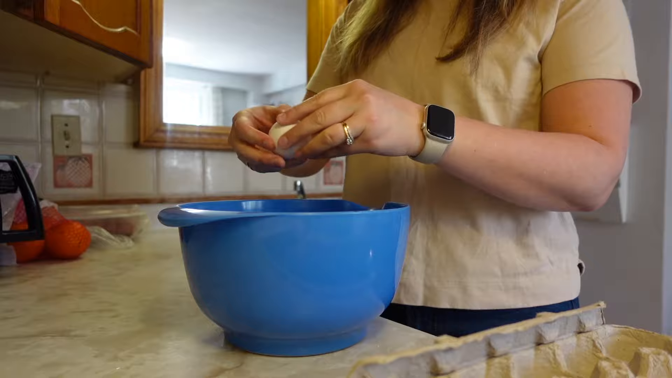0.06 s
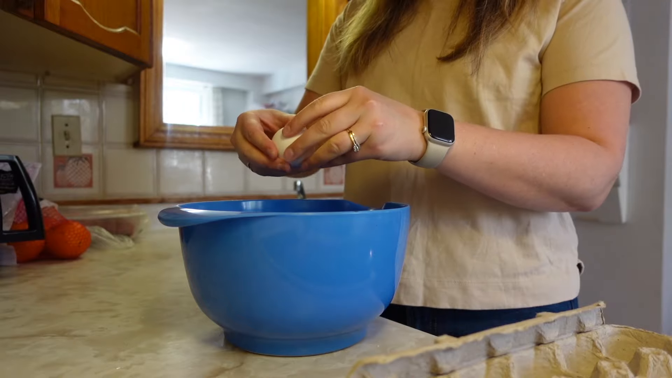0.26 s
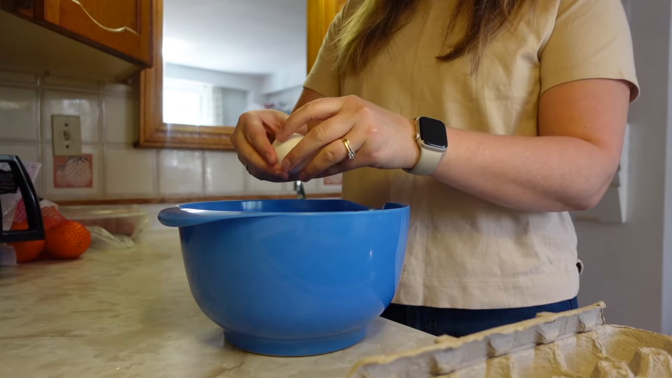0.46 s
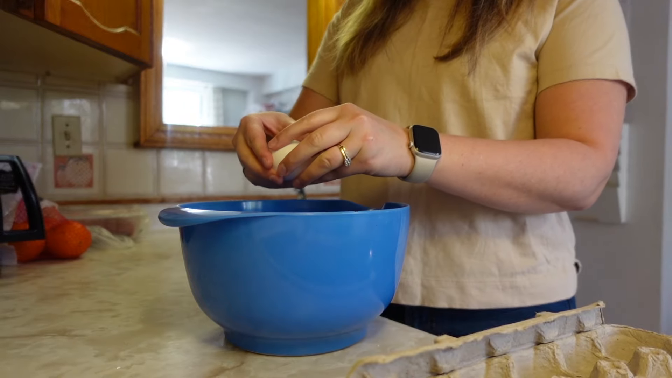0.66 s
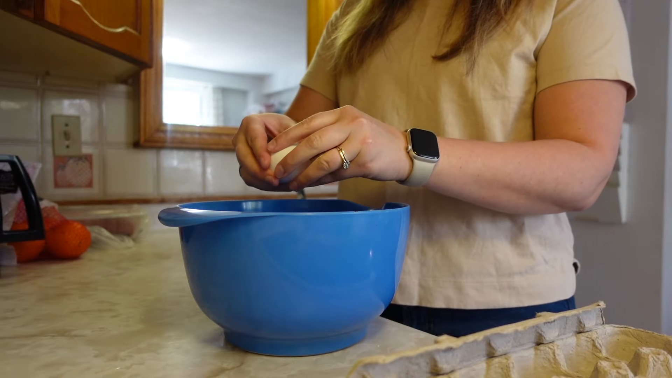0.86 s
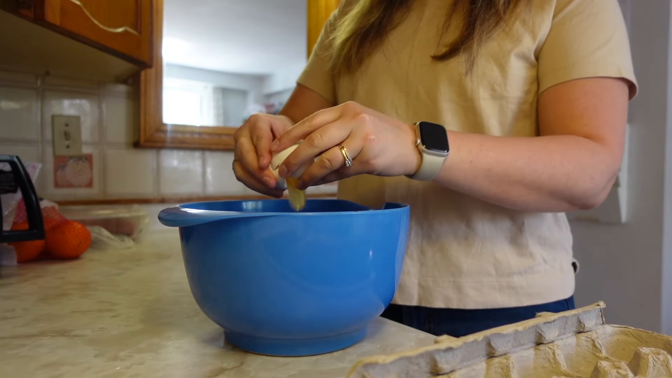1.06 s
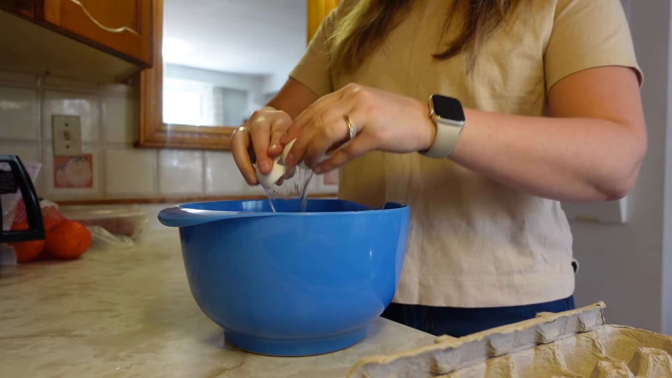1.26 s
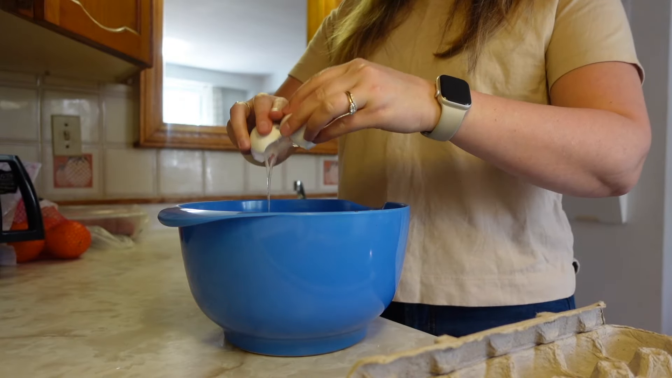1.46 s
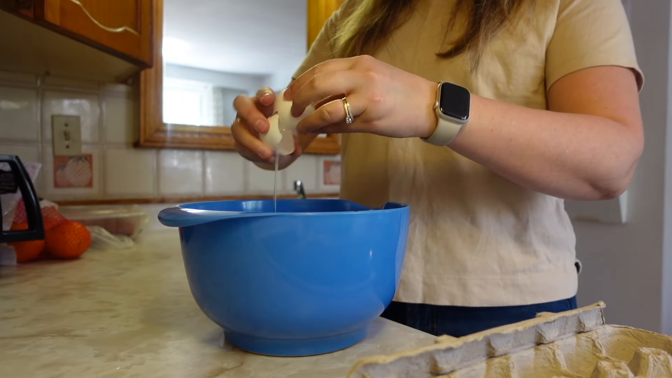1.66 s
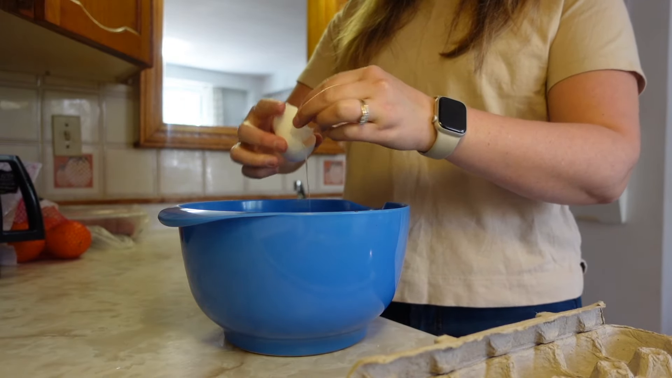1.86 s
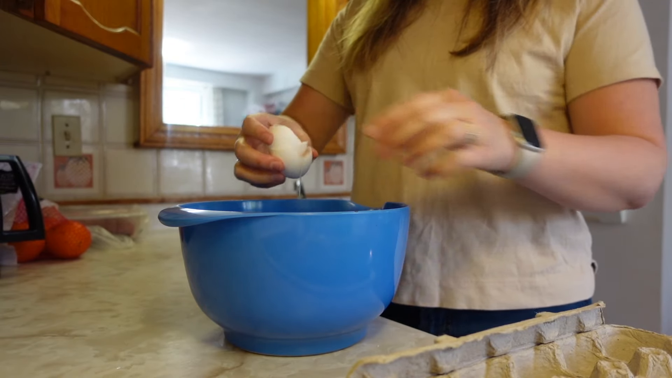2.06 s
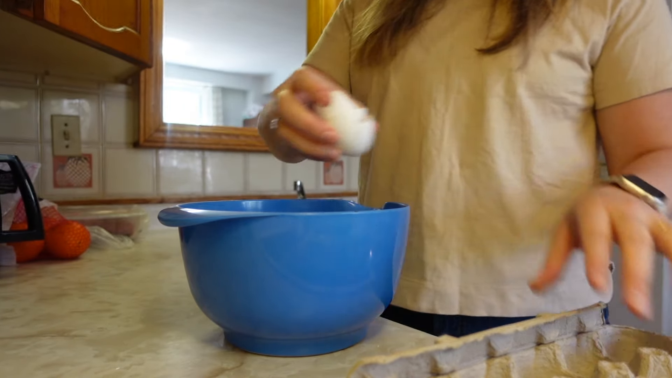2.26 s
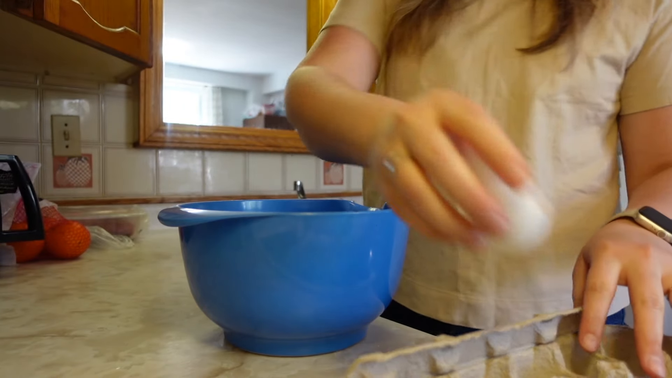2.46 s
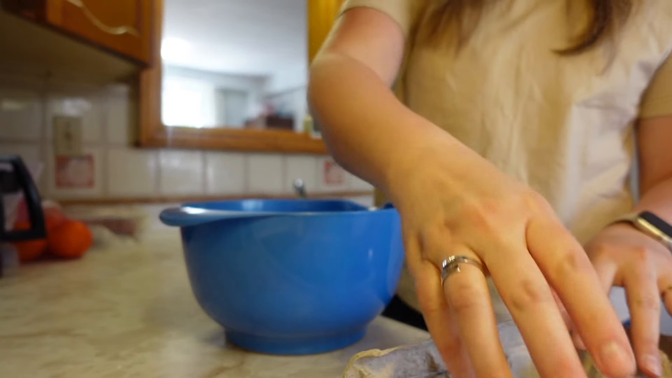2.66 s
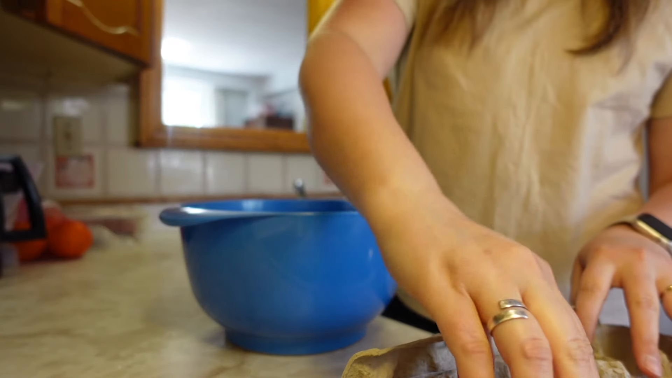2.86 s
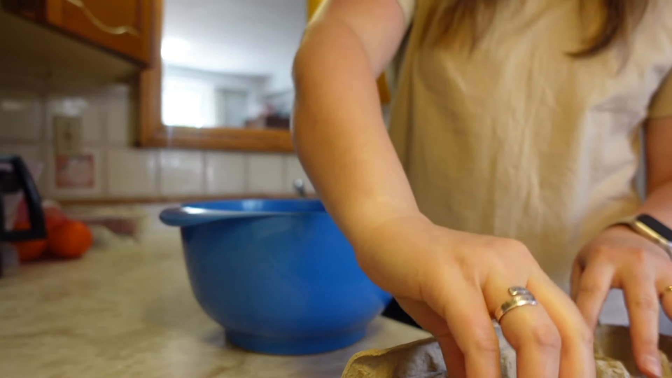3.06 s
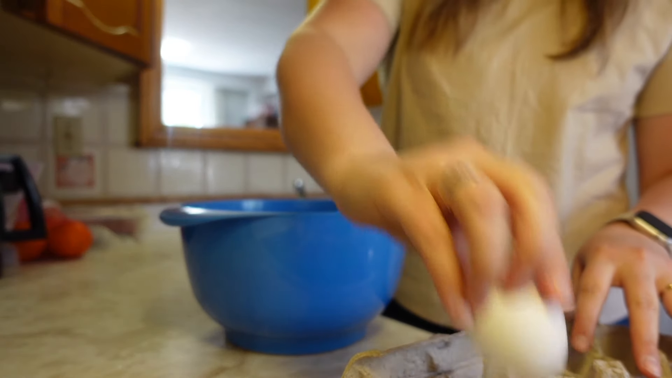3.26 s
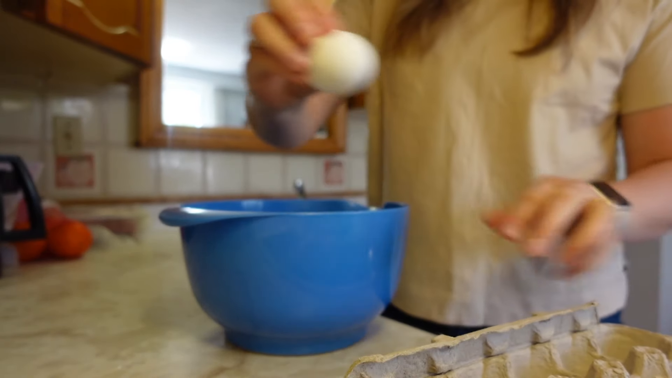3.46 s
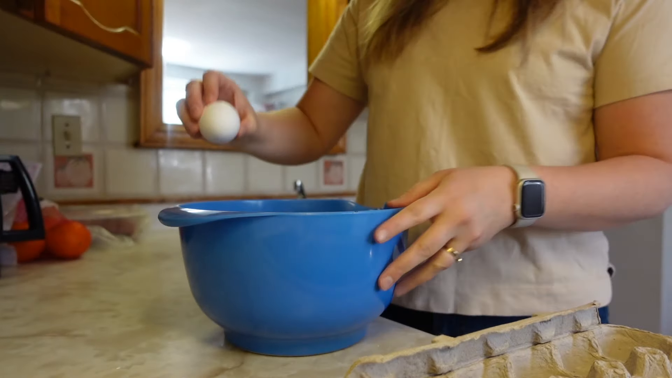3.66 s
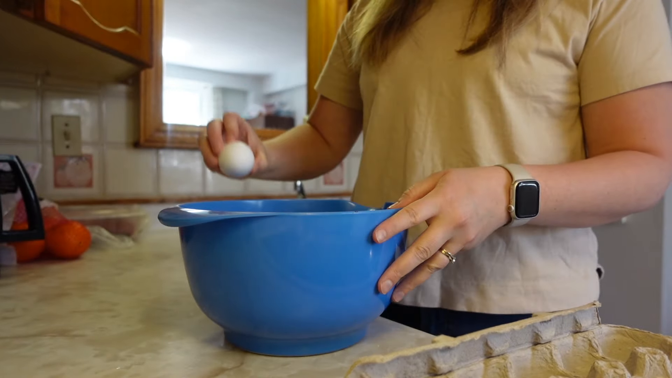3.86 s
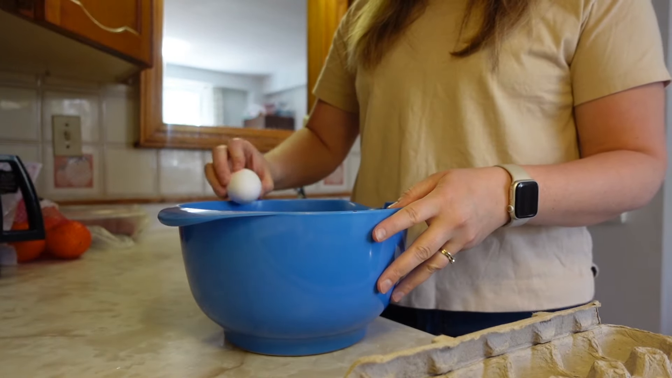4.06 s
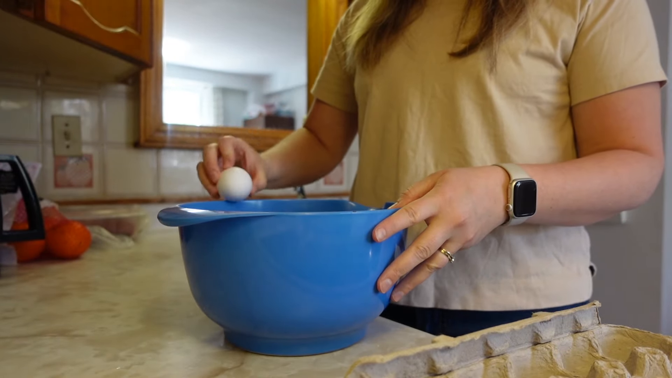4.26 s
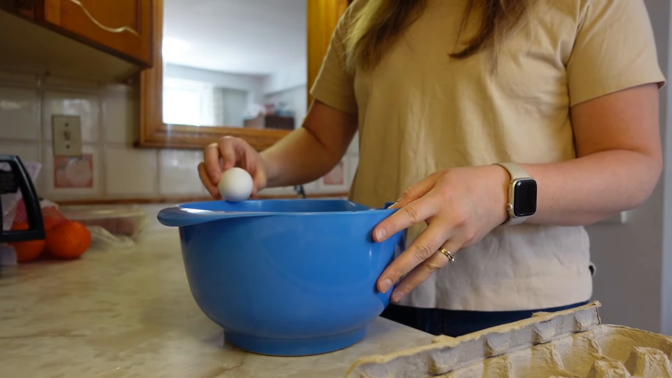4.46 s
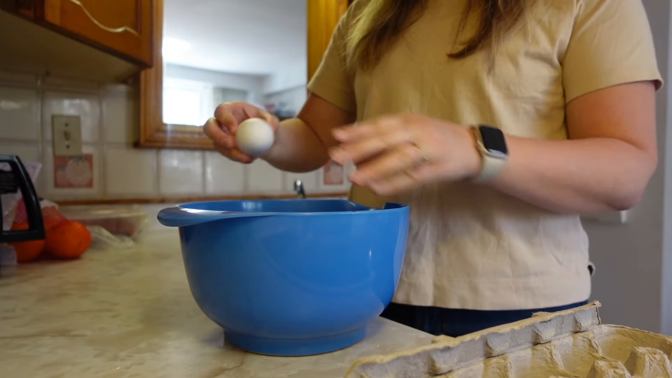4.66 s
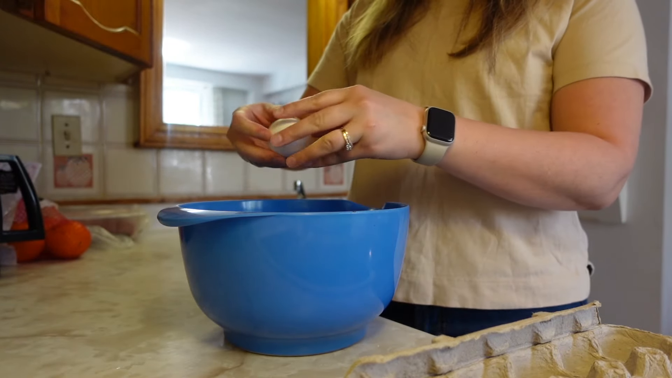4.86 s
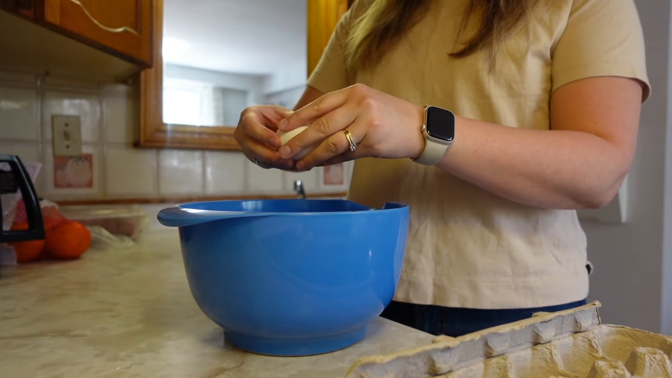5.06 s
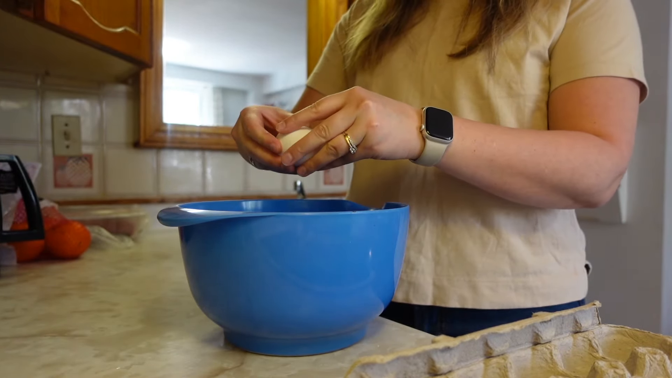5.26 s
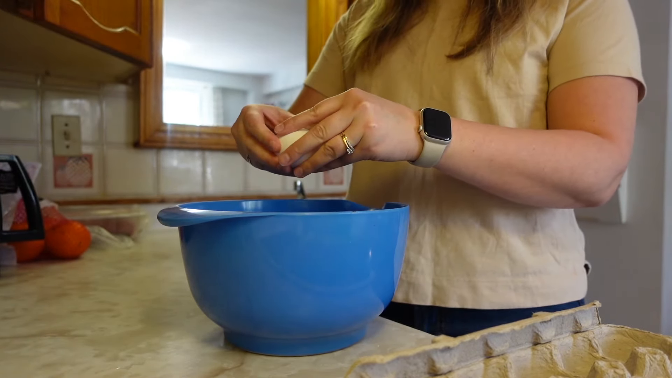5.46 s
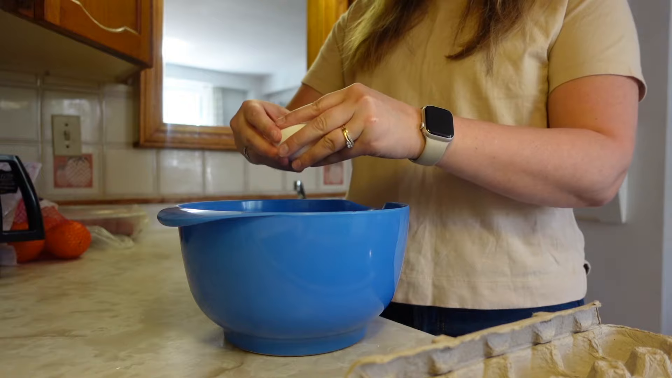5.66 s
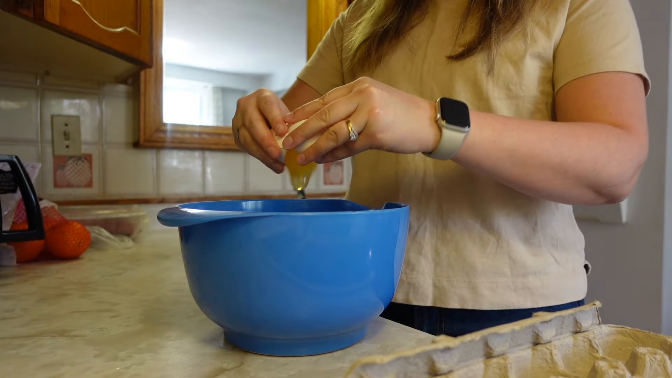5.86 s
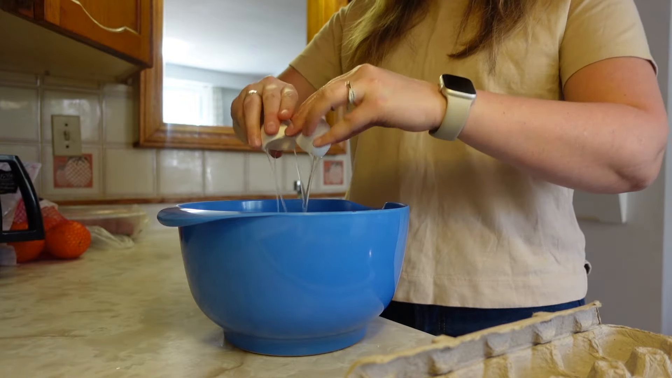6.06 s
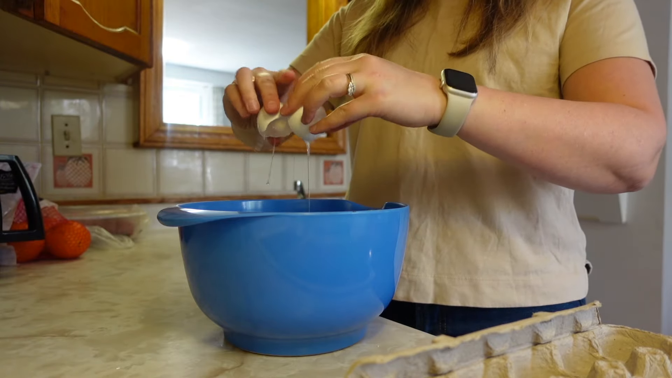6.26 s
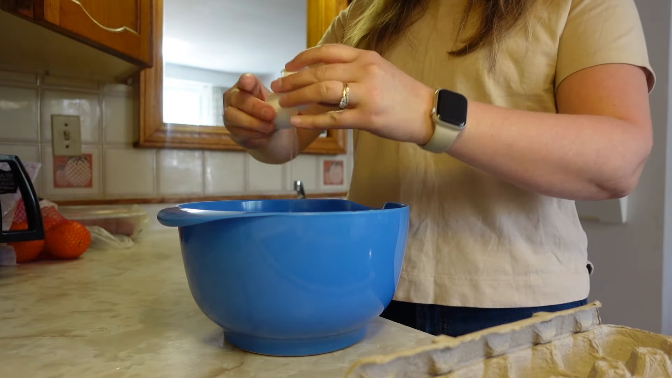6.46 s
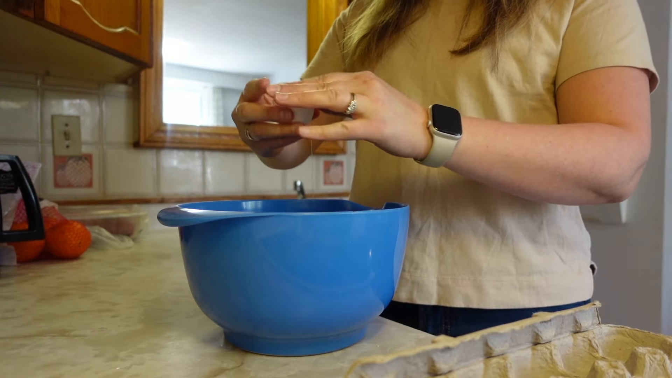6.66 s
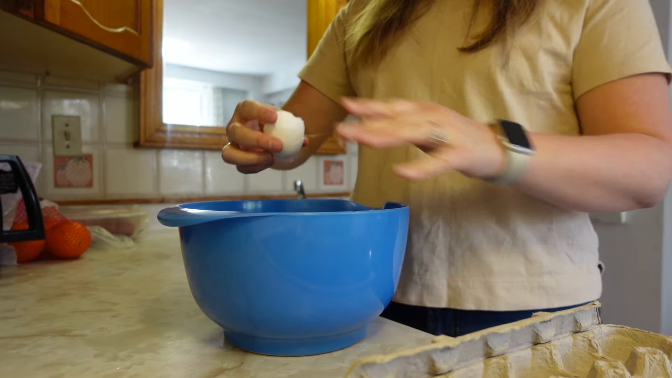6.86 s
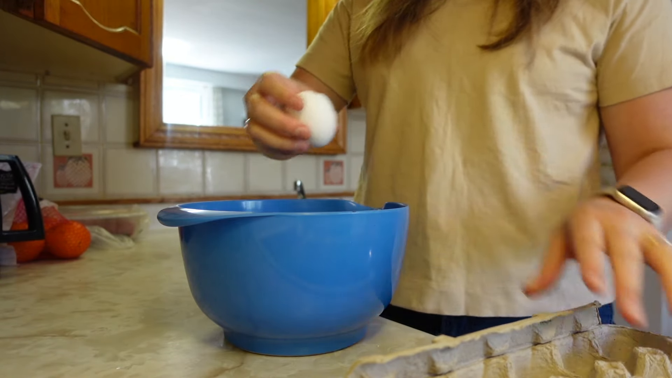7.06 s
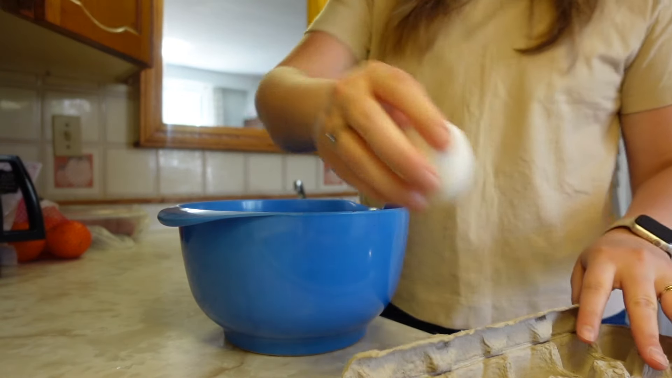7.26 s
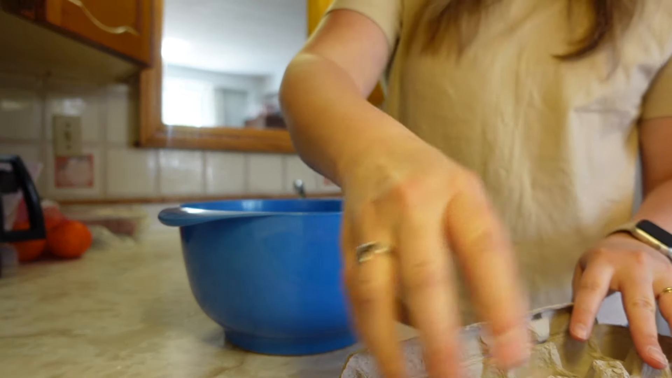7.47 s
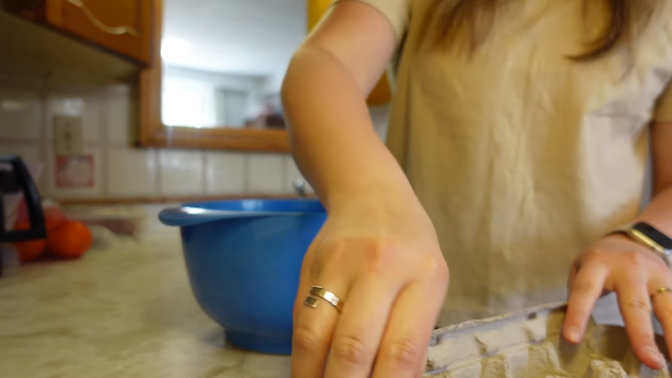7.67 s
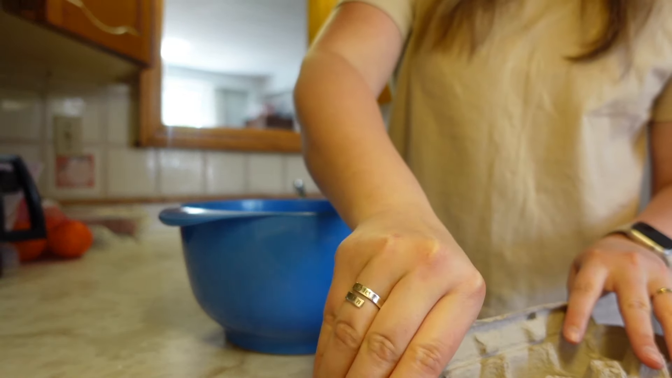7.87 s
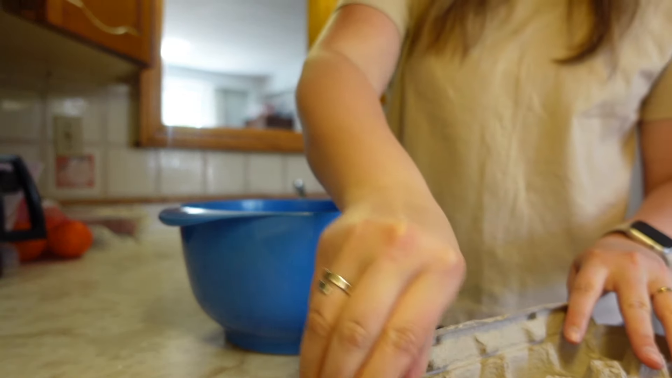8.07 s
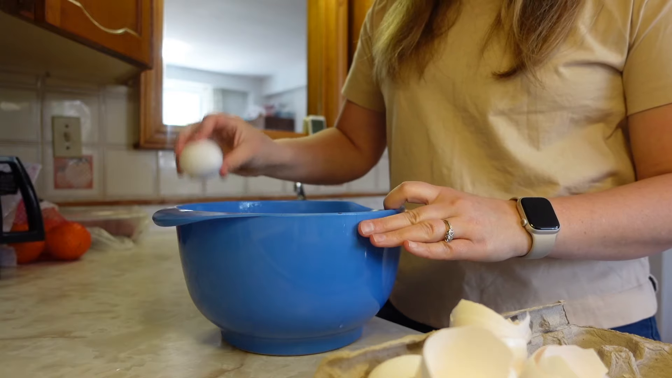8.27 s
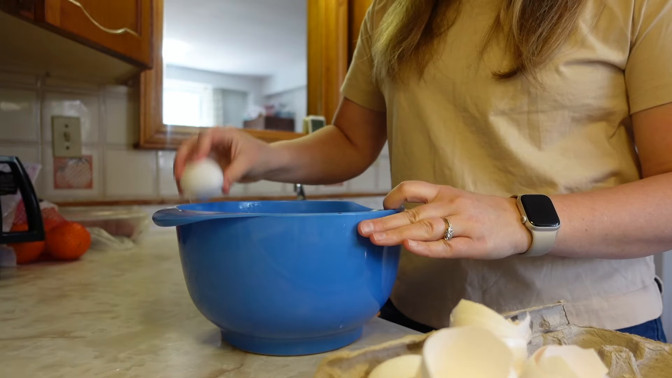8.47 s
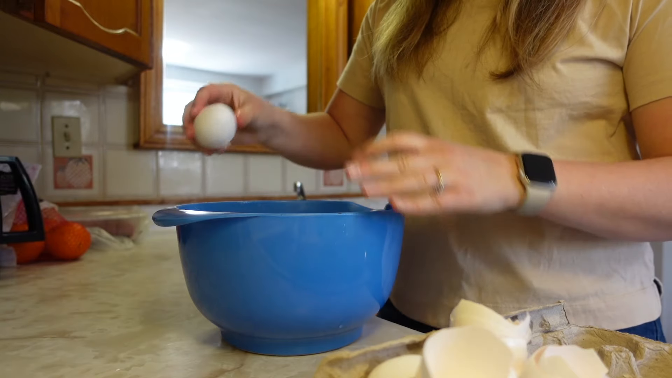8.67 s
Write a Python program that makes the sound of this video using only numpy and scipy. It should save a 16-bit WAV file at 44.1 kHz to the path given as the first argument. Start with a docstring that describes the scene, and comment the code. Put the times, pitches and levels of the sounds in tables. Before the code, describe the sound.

Close, crisp egg cracking in a tiled kitchen: brittle splintering, papery carton knocks and rubs, sharp rim taps, with a soft appliance drone underneath.

```python
"""Eggs cracked in a tiled kitchen

Close stereo microphones hear eggs crushed on the rim of a plastic bowl: noise bursts ring rim and bowl wall.
Shells snap and crunch in the fingers, a little left: splinter bursts ring a hollow that changes with the opening.
A yolk plops into the bowl, and shells and a hand knock and rub a pulp carton: shaped noise, slightly right.
Noise tails answer as the tiled walls; an appliance hums under it all with tones and resonant air noise."""
import sys
import numpy as np
from scipy import signal
from scipy.fft import rfft, irfft, next_fast_len
from scipy.io import wavfile
from scipy.ndimage import uniform_filter1d, map_coordinates

SR = 44100
rng = np.random.default_rng(int(sys.argv[2]) if len(sys.argv) > 2 else 0)


def persist_wave(psi):
    """Save psi, clipped to +-1, as 16-bit WAV."""
    counts = np.round(np.clip(psi, -1, 1) * 32767).astype(np.int16)
    wavfile.write(sys.argv[1], SR, np.atleast_2d(counts).T)


def field_ratio(decibels):
    """Amplitude ratio for a level in dB (20 dB per decade); scalars and array-likes work."""
    return 10 ** (np.asarray(decibels, dtype=float) / 20)


N = 384111  # samples

# Motor tones. Each row: frequency in Hz, level in dB rms before it sways.
MOTOR_TONES = [(59.2, -75.5), (119.5, -50.5), (149, -49.5), (468.5, -65.5)]
# Air noise in casing and room. Each row: resonance in Hz, width in Hz, relative level in dB.
DRONE_MODES = [(134.2, 28.5, -5.5), (197.3, 27.7, 0), (255.5, 18.3, 0), (326.7, 32, -7.5),
               (368.7, 46, -7.5), (454, 29, -16.5)]
# Spectrum of room air and hiss. Each row: frequency in Hz, relative level in dB per Hz.
AIR_SPECTRUM = [(25, -12), (90, 5), (500, 4.5), (680, -6.5), (950, -2), (1500, -10.5), (6400, -15.5),
                (16000, -17.5)]
# Left-right likeness of the air. Each row: frequency in Hz, correlation from -1 to 1.
AIR_LIKENESS = [(450, 1), (950, .3), (2400, .1), (15000, .5)]
DRONE_DB, AIR_DB = -47.5, -58.5  # rms
# High tones dying away from the start. Each row: frequency in Hz, level in dB rms, 6.5 below the starting level.
FADING_TONES = [(2186, -79.5), (2945, -75), (5146, -87)]

# Shell snapping in the fingers. Each row: time in seconds, nominal peak in dB, hollow relative to it in dB,
# resonance of the stiff shell in Hz.
SHELL_SNAPS = [(0.4436, -29.5, -11.5, 6900), (0.4967, -17, -72, 7900), (.703, -52, -30, 5700),
               (0.877, -42.5, -44, 10000), (0.9242, -12, -14.5, 9550), (0.939, -19, -6, 4250),
               (0.951, -30.5, 3.5, 6000), (1.031, -17, -7, 6700), (1.0353, -13.5, -20.5, 6600),
               (1.059, -9, -9, 6460), (1.1439, -38, 14.5, 5700), (1.172, -22.5, -7.5, 7100),
               (1.273, -17, -26, 5960), (1.3307, -19.5, 2.5, 5170), (1.3733, -21.5, -9, 6650),
               (1.4368, -33.5, -13, 5930), (1.524, -25.5, -10, 6630), (1.5386, -19, -9.5, 6500),
               (1.56, -21, -11, 3560), (1.5924, -17, -17, 8000), (1.6253, -24, -2.5, 4230),
               (1.667, -58, -3, 6200), (1.6878, -23.5, -1, 6500), (1.71, -16, -6, 6630),
               (1.7552, -22.5, -1, 6700), (1.763, -24, -10, 8980), (1.818, -27.5, -3, 6180),
               (1.8543, -26, -0.5, 6300), (1.887, -36.5, -17, 5830), (1.925, -41, -0.5, 5960),
               (2.037, -31, -7.5, 8500), (5.088, -50, -26, 6450), (5.269, -51, -27, 6800),
               (5.415, -46, -28.5, 9500), (5.66, -44.5, -35, 10200), (5.7421, -15, -26, 9150),
               (5.748, -21.5, -17, 3330), (5.7886, -28.5, -7.5, 6700), (5.881, -34.5, -14, 8450),
               (5.928, -31.5, -10.5, 3460), (5.9392, -18.5, -3.5, 3620), (6.08, -39, -1, 4740),
               (6.097, -36, -0.5, 5000), (6.1177, -23.5, -7.5, 9900), (6.193, -27.5, -5.5, 8650),
               (6.203, -25.5, -32, 3380), (6.2326, -32.5, -17, 3190), (6.2572, -24, -17, 6630),
               (6.2803, -21, -15, 6700), (6.291, -15.5, -24, 6520), (6.3061, -19.5, -20, 6500),
               (6.444, -43, -10, 4190), (6.468, -41.5, -7, 8750), (6.511, -36, -2.5, 3200),
               (6.529, -31, -22, 6400), (6.619, -29.5, -3, 6450), (6.638, -30, -5.5, 6370),
               (6.6463, -19.5, -10, 9000), (6.66, -40.5, -18, 3900), (6.8445, -38.5, -15, 9650)]
# The opening of each egg. Each row: halves part in seconds, fully open in seconds, halves start to nest in
# seconds, nested in seconds, hollow of the nested halves in Hz.
EGG_OPENINGS = [(0.918, 1.081, 1.4, 1.51, 2160), (6.105, 6.13, 6.33, 6.505, 2030)]
NEXT_EGG_S = 4  # shell sounds from here on belong to the second egg
SHUT_HZ, OPEN_HZ = 2830, 1730  # pitch of the hollow
HOLLOW_SCATTER, NESTED_SCATTER = .015, .08  # log spread of that pitch from one fracture to the next, free and nested
DOME_HZ, DOME_DB = 3480, -12  # the dome of the half shell rings beside the hollow; mean level
SNAP_T60_S, SNAP_SCATTER = 0.061, 0.15  # crumble of a fracture, and its log spread
SHARP_PER_DB = 0.0278  # harder snaps crumble more briefly (log t60 per dB)
SCRAPE_RISE_S = .0014  # onset when the halves are nested
GRIT = .8  # log spread of the tiny breaks inside a fracture
SHED_DB, SHED_S, SHED_FADE_DB_PER_S = -34, 0.11, -32  # splinters after a snap: lowest level under it, mean delay, fading
LEAD_DB, LEAD_S = -36, .015  # creak just before a snap: lowest level under it, mean lead
GRIND_DB, GRIND_S = -44, .22  # nested halves grinding: lowest level at mid-grind, duration

# Yolk landing in the bowl: time in seconds, thump in dB, wet tone in dB before its soft onset.
YOLK_PLOP = (1.334, -34, -31.5)
PLOP_T60_S = .14
# Worktop under the bowl. Each row: mode in Hz, width in Hz, relative level in dB.
WORKTOP_MODES = [(86, 23, -1.5), (114.5, 11, 10), (179, 16, 15.5), (231, 61, 11.5)]

# Hand and eggs rubbing the pulp. Each row: start in seconds, end in seconds, starting level in dB,
# ending level in dB (both before the texture), strongest frequency in Hz.
PULP_STROKES = [(2.381, 2.618, -47.5, -75.5, 1570), (2.954, 3.065, -41, -41.5, 2090),
                (3.055, 3.14, -45, -48, 3770), (3.159, 3.233, -44, -51, 5400),
                (3.33, 3.42, -47.5, -58.5, 1640), (3.7, 3.762, -52, -63, 3370),
                (7.216, 7.29, -53.5, -67, 1900), (7.527, 7.663, -33.5, -35.5, 915),
                (7.666, 7.838, -41, -46.5, 2100), (7.817, 7.877, -36.5, -45.5, 3860),
                (7.866, 7.952, -37.5, -41.5, 3270), (7.99, 8.09, -62, -51.5, 1210)]
# Carton cups. Each row: resonance in Hz, width in Hz, relative level in dB.
CUP_MODES = [(800, 360, 3), (1800, 500, 3), (3500, 500, 1), (5500, 450, 0), (7000, 450, -2)]
PAPER_DB, PAPER_DB_PER_OCTAVE = -8, 2  # treble of a stroke at 1 kHz; higher strokes are more papery

# Shells and knuckles knocking the carton. Each row: time in seconds, nominal peak in dB, pitch in Hz,
# treble relative to the peak in dB, t60 in seconds.
CARTON_KNOCKS = [(2.658, -13.5, 1300, -4.5, 0.076), (2.679, -15, 756, -7, 0.092),
                 (2.887, -36, 1780, -2, 0.06), (3.394, -35, 1630, 0, 0.059),
                 (7.515, -14.5, 905, -14.5, 0.1), (7.531, -24, 960, 9.5, 0.078),
                 (7.584, -21, 910, 7.5, 0.056), (7.603, -14.5, 1426, 3, 0.038),
                 (7.647, -14.5, 1050, -15, 0.032), (7.914, -31, 1260, -7, 0.029),
                 (8.007, -34, 1160, -21, 0.031), (8.132, -43.5, 710, 0.5, 0.078)]
THUD_DB, HOLLOW_SHARE = -9.5, .75  # thud over boxy tone; gain of the hollow shell inside a knock

# Egg on the bowl rim. Each row: time in seconds, nominal crush peak in dB, push into the bowl in dB,
# crush t60 in seconds.
RIM_TAPS = [(4.089, -20.5, -19, 0.42), (4.2834, -11, -17, 0.099), (4.465, -9, -21, 0.089),
            (8.3485, -18.5, -27.5, 0.56), (8.3988, -16, -27.5, 0.078), (8.528, -10.5, -31, 0.11),
            (8.5652, -18, -47, 0.1)]
# Egg and rim; a close pair of modes carries the clearest note. Each row: mean resonance in Hz, width in Hz,
# mean relative level in dB.
RIM_MODES = [(1900, 220, -15), (2946, 49, -7.5), (3120, 240, -6.5), (3300, 240, -6.5), (3567, 110, -11.5),
             (3900, 250, -14.5), (4380, 110, -8), (3940, 2100, -10.5)]
# Bowl wall. Each row: resonance in Hz, width in Hz, relative level in dB.
BOWL_MODES = [(312, 250, -0.5), (488, 280, 0), (960, 80, 2), (1060, 80, 1), (1613, 420, -5)]
# Blows that set the bowl's clearest note ringing. Each row: time in seconds, starting level in dB.
BOWL_BELL = [(8.349, -31), (8.527, -39.5)]
THUMP_DB, CRUSH_TREBLE_DB = 2, -1.5  # worktop over bowl wall; treble over rim

# Reverberation of the tiled kitchen. Each row: frequency in Hz, t60 in seconds.
KITCHEN_T60 = [(120, 0.41), (1000, 0.57), (4000, 0.5), (12000, 0.34)]


def unit(x):
    """Scale each row to rms 1."""
    return x / np.sqrt(np.mean(x ** 2, -1, keepdims=True) + 1e-20)


def along(points, hz):
    """Interpolate (Hz, value) points on a log axis."""
    f, v = np.transpose(points)
    return np.interp(np.log(hz + 1), np.log(f + 1), v)


def filtered(x, response):
    """Pass x through a complex response of frequency."""
    m = next_fast_len(x.shape[-1] + min(8192, 2 * x.shape[-1]))
    return irfft(rfft(x, m) * response(np.fft.rfftfreq(m, 1 / SR)), m)[..., :x.shape[-1]]


def peak(f, hz, width_hz):
    """One causal resonance."""
    return 1j * f * width_hz / (hz * hz - f * f + 1j * f * np.abs(width_hz) + 1e-9)


def body(modes):
    """Response of a table of resonances, with alternating signs."""
    return lambda f: sum((-1) ** k * field_ratio(db) * peak(f, hz, w) for k, (hz, w, db) in enumerate(modes))


def bursts(t60, spike, rise_s, size=8192, grit=0):
    """One row of dying splinter noise per event, led by one sharp break; grit makes some samples far larger."""
    t = np.arange(size) / SR
    decay = field_ratio(-60 * t / np.abs(t60)[:, None])
    noise = rng.standard_normal((len(t60), size)) * decay * (1 - np.exp(-t / rise_s))
    return noise * np.exp(grit * rng.standard_normal(noise.shape) - grit ** 2) + spike * (t == 0)


def sized(rows, db, t60=None):
    """Set each row's peak level; a noisy row gets the energy of a decay with that peak."""
    if t60 is None:
        return rows / np.abs(rows).max(1, keepdims=True) * field_ratio(db)[:, None]
    energy = np.abs(t60) * SR / (2 * np.log(1000)) / 5  # noise peaks stand above its rms
    return rows * (field_ratio(db) * np.sqrt(energy / np.sum(rows ** 2, 1)))[:, None]


def placed(s, rows):
    """Lay the rows on the time line."""
    at = np.round(s * SR).astype(int)[:, None] + np.arange(rows.shape[1])
    return np.bincount(at.ravel(), rows.ravel(), N + SR)[:N]


def hum():
    """Slightly unsteady motor tones, air droning in low resonances, and faint room air."""
    t = np.arange(N) / SR
    knots = rng.standard_normal((len(MOTOR_TONES), 40))
    sway = [map_coordinates(k, [t * 2.4]) for k in knots]  # 2.4 knots a second
    tones = sum(field_ratio(db + 1.0 * w) * np.sqrt(2) * np.sin(2 * np.pi * hz * t + 1.0 * w)
                for (hz, db), w in zip(MOTOR_TONES, sway))
    drone = filtered(rng.standard_normal(N), lambda f: body(DRONE_MODES)(f) * peak(f, 228, 340))

    def mid_side(f):
        turn = np.arccos(np.clip(along(AIR_LIKENESS, f), -1, 1)) / 2
        return field_ratio(along(AIR_SPECTRUM, f)) * [np.cos(turn), np.sin(turn)]

    mid, side = filtered(rng.standard_normal((2, N)), mid_side)
    air = unit(np.array([mid + side, mid - side]))
    return tones + field_ratio(DRONE_DB) * unit(drone) + field_ratio(AIR_DB) * air


def fading():
    """Thin unsteady tones, narrow bands of noise, die away from the start by 60 dB in 2.7 s."""
    noise = rng.standard_normal((len(FADING_TONES), N))
    hz, db = np.transpose(FADING_TONES)[:, :, None]
    tones = unit(filtered(noise, lambda f: peak(f, hz, 79) ** 2))
    return (field_ratio(db + 6.5 - 60 * np.arange(N) / SR / 2.7) * tones).sum(0)


def hollow_hz(s):
    """The hollow drops in pitch as the halves part and rises when one is put into the other."""
    first, second = (np.interp(s, times, [SHUT_HZ, OPEN_HZ, OPEN_HZ, nested_hz])
                     for *times, nested_hz in EGG_OPENINGS)
    return np.where(s < NEXT_EGG_S, first, second)


def nested(s):
    """Whether one half shell sits in the other, as a column; for the second egg, from .07 s before the end."""
    return (s > np.where(s < NEXT_EGG_S, EGG_OPENINGS[0][3], EGG_OPENINGS[1][3] - .07))[:, None]


def shell(s, db, cavity_db, shell_hz, t60, **kind):
    """A fracture rings the hollow of the half shell, pitched by the opening, and the stiff shell itself."""
    inside = nested(s)
    scatter = np.where(inside[:, 0], NESTED_SCATTER, HOLLOW_SCATTER)
    cavity_hz = (hollow_hz(s) * np.exp(scatter * rng.standard_normal(len(s))))[:, None]
    cavity_width_hz = np.where(inside, 300, 240)
    dome = field_ratio(DOME_DB + 4 * rng.standard_normal((len(s), 1)))
    hollow = filtered(bursts(t60, **kind), lambda f: peak(f, cavity_hz, cavity_width_hz)
                      * peak(f, cavity_hz, 2500) - dome * peak(f, DOME_HZ, 450))
    # small high-pitched flakes spray more broad treble than big wet pieces
    hz = shell_hz[:, None]
    stiff = filtered(bursts(t60, **kind),
                     lambda f: peak(f, hz, 0.15 * hz) + hz / 14000 * peak(f, 8300, 14000) ** 2)
    return placed(s, sized(hollow, db + cavity_db, t60) + sized(stiff, db, t60))


def snaps():
    """Fractures that stand out: the shorter the crumble, the cleaner the break; nested halves scrape in slowly."""
    s, db, cavity_db, shell_hz = np.transpose(SHELL_SNAPS)
    scatter = SNAP_SCATTER * rng.uniform(-1.2, 1, len(s))
    t60 = SNAP_T60_S * np.exp(scatter - SHARP_PER_DB * (db - db.mean()))
    spike = 0.099 / t60[:, None] * ~nested(s)
    rise_s = np.where(nested(s), SCRAPE_RISE_S, .0004)
    return shell(s, db, cavity_db, shell_hz, t60, spike=spike, rise_s=rise_s, size=4096, grit=GRIT)


def splinters(s, db):
    """Tiny fractures of uneven size and pitch, practically none below the given level."""
    size, pitch = rng.random((s.size, 2)).T
    level_db = db.ravel() - 3 * np.log(size + 0.00065)
    shell_hz = 6400 * np.exp(.45 * (pitch - .5))
    return shell(s.ravel(), level_db, -2.5, shell_hz, np.full(s.size, .012), spike=0, rise_s=0.00049, size=640)


def crunch():
    """Every snap is led in by a creak and sheds a trail of splinters; nested halves grind on each other."""
    at, level_db = np.transpose(SHELL_SNAPS)[:2, :, None]
    late = -np.log(rng.random((len(SHELL_SNAPS), 18)) + 1e-3)  # exponential waits
    early = -np.log(rng.random((len(SHELL_SNAPS), 4)) + 1e-3)
    trail = splinters(at + SHED_S * late, level_db + SHED_DB + SHED_FADE_DB_PER_S * SHED_S * late)
    creak = splinters(at - LEAD_S * early, level_db + LEAD_DB - 4 * early)
    part = rng.random((len(EGG_OPENINGS), 70))
    nested_s = np.transpose(EGG_OPENINGS)[3, :, None]
    grind = splinters(nested_s + GRIND_S * part, GRIND_DB - 25 * (part - .5) ** 2)
    return trail + creak + grind


def thumps(s, db):
    """A slow push shakes the worktop, which radiates little below its first mode."""
    push = np.exp(-((np.arange(SR // 4) / SR - .011) / 0.0025) ** 2)
    shaken = filtered(push, lambda f: body(WORKTOP_MODES)(f) * (1j * f / (70 + 1j * f)) ** 3)
    return placed(s, sized(shaken[None], db))


def plop():
    """A yolk thumps into the bowl and traps air, whose tone rises a little as it dies."""
    t = np.arange(SR // 2) / SR
    s, low_db, wet_db = np.transpose([YOLK_PLOP])
    swell = field_ratio(wet_db - 60 * t / PLOP_T60_S) * (1 - np.exp(-t / .006))
    wet = swell * np.sin(2 * np.pi * 1020 * t * (1 + t))[None]
    return thumps(s, low_db) + placed(s, wet)


def rustle():
    """Fibres catch and slip under the hand in short strokes, each favouring its own band."""
    start, end, start_db, end_db, hz = np.transpose(PULP_STROKES)[:, :, None]
    t = np.arange(SR // 4) / SR
    noise = rng.standard_normal((4, len(PULP_STROKES), len(t)))
    lumps = unit(uniform_filter1d(noise[0], size=260))
    grains = unit(uniform_filter1d(noise[0, ::-1], size=30))
    clumps = field_ratio(2.0 * lumps + 1.94 * grains)
    cups = unit(filtered(noise[1], body(CUP_MODES)))
    band = .7 * unit(filtered(noise[2], lambda f: peak(f, hz, .45 * hz) ** 2))
    paper_gain = field_ratio(PAPER_DB + PAPER_DB_PER_OCTAVE * np.log2(hz / 1000))
    paper = paper_gain * unit(filtered(noise[3], lambda f: peak(f, 8600, 11100) ** 2))
    length = end - start
    stroke = np.clip(np.minimum(t / (0.27 * length), (length - t) / 0.0073), 0, 1)  # swells in, stops sooner
    level = field_ratio(start_db + (end_db - start_db) * np.clip(t / length, 0, 1))
    return placed(start[:, 0], stroke * level * clumps * (cups + band + paper))


def knocks():
    """Dull pulp knocks: a thud, a boxy tone with the hollow shell in it, and a papery edge."""
    s, db, hz, treble_db, t60 = np.transpose(CARTON_KNOCKS)
    burst, paper = (bursts(t60, spike=0.47, rise_s=0.000087, grit=grit) for grit in (0, GRIT))
    thud = filtered(burst, lambda f: peak(f, 290, 730) ** 2)
    box = filtered(burst, lambda f: peak(f, hz[:, None], 570) + 0.17 * peak(f, 960, 2020)
                   - HOLLOW_SHARE * peak(f, OPEN_HZ, 180))
    edge = filtered(paper, lambda f: peak(f, 5980, 12000) ** 2 + .5 * peak(f, 5700, 1400))
    return placed(s, sized(thud, db + THUD_DB, t60) + sized(box, db, t60) + sized(edge, db + treble_db, t60))


def taps():
    """The egg crushes on the rim and the bowl wall rings; returns that and the push into the worktop."""
    s, db, push_db, t60 = np.transpose(RIM_TAPS)
    burst, crush = (bursts(t60, spike=0, rise_s=0.00035) for _ in range(2))
    # each blow lands elsewhere
    struck = [(hz * np.exp(.008 * rng.standard_normal((len(s), 1))), width,
               level + 1.5 * rng.standard_normal((len(s), 1))) for hz, width, level in RIM_MODES]
    rim = sized(filtered(burst, body(struck)), db, t60)
    wall = sized(filtered(crush, body(BOWL_MODES)), push_db, t60)
    quick = .7 * t60  # the treble of the crush dies first
    treble = filtered(bursts(quick, spike=0, rise_s=0.0013, grit=GRIT), lambda f: peak(f, 6570, 6300) ** 2)
    edge = sized(treble, db + CRUSH_TREBLE_DB, quick)
    return placed(s, rim + wall + edge), thumps(s, push_db + THUMP_DB)


def bell():
    """The bowl's clearest note rings down by 60 dB in 0.37 s, its phase wavering slightly at random."""
    t = np.arange(SR // 2) / SR
    s, db = np.transpose(BOWL_BELL)
    waver = unit(uniform_filter1d(rng.standard_normal((len(s), len(t))), size=700))
    return placed(s, field_ratio(db[:, None] - 60 * t / 0.37) * np.sin(2 * np.pi * 732 * t + 0.21 * waver))


def microphones(x, left):
    """A source off to the left is louder in the left microphone, more so in the treble; negative is right."""
    side = left * filtered(x, lambda f: 1j * f / (2500 + 1j * f))
    return x + np.array([side, -side])


def kitchen(x, side_db):
    """Tiled walls answer, with a new tail every fifth of a second; close microphones hear the bass alike."""
    step, out = SR // 5, np.zeros((2, N + 2 * SR))
    for at in range(0, N, step):
        hz, t, z = signal.stft(rng.standard_normal((2, SR // 2)), SR, nperseg=256)
        tail = signal.istft(z * field_ratio(-60 * t / along(KITCHEN_T60, hz)[:, None]), SR, nperseg=256)[1]
        wet = signal.fftconvolve(x[None, at:at + step], tail / np.linalg.norm(tail[0]), axes=1)
        out[:, at + 220:][:, :wet.shape[1]] += wet  # the tail starts 5 ms late
    side = field_ratio(side_db) * filtered(out[1, :N], lambda f: (1j * f / (280 + 1j * f)) ** 2 * (1 + f / 25000))
    return out[0, :N] + np.array([side, -side])


def scene():
    """Hands and rim a little to the left, carton a little to the right, bowl farther and wetter."""
    hands, drops, rubs = snaps() + crunch(), knocks(), rustle()
    crushes, push = taps()
    rim, thump = crushes + bell(), push + plop()
    near = microphones(hands, left=0.24) + microphones(rim, left=0.15) + microphones(drops + rubs, left=-0.13)
    sent = field_ratio(-8.0) * hands + field_ratio(-4.5) * drops + field_ratio(-9) * rubs + field_ratio(-2.5) * rim + field_ratio(-14.5) * thump
    return near + thump + kitchen(sent, side_db=-9) + hum() + fading()


def top_cut(x):
    """Nothing passes above the cut-off."""
    return signal.sosfilt(signal.butter(12, 16990, fs=SR, output="sos"), x)


def record(dry):
    """The top octave droops, and little passes above the band edge at 15.8 kHz."""
    heard = filtered(dry, lambda f: np.where(f < 15800, 1, .04) / (1 + (f / 16000) ** 2))
    return top_cut(heard)


dry = scene()
out = record(dry)
persist_wave(out)
```